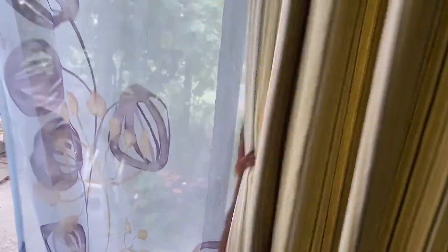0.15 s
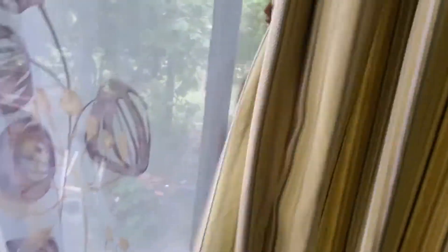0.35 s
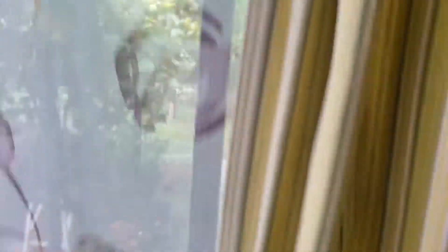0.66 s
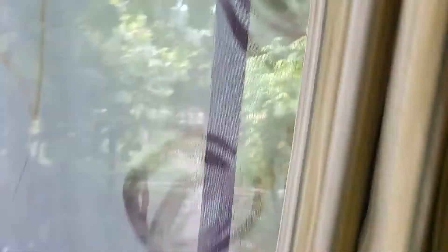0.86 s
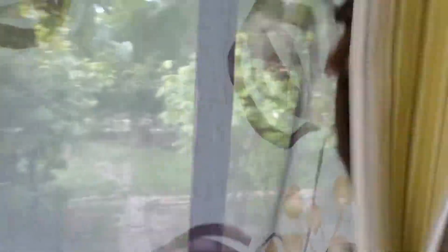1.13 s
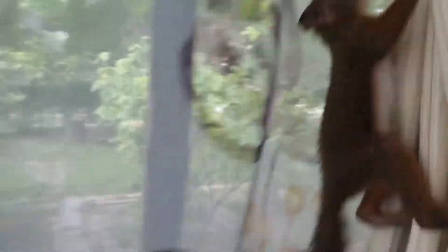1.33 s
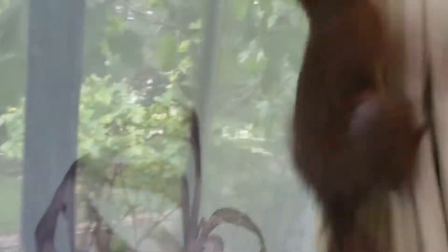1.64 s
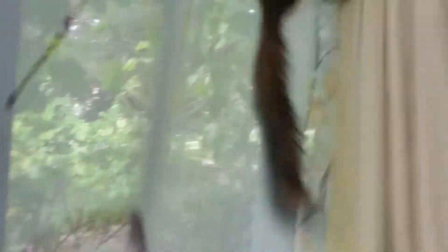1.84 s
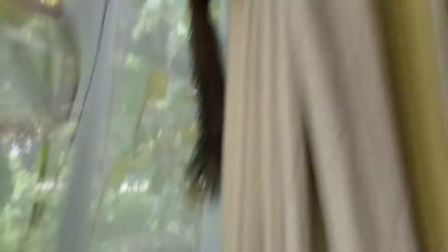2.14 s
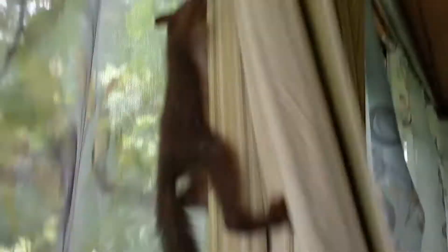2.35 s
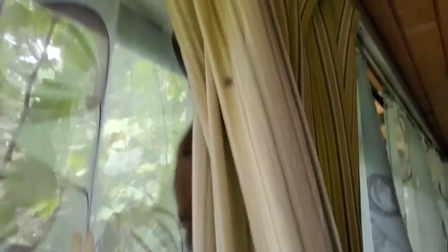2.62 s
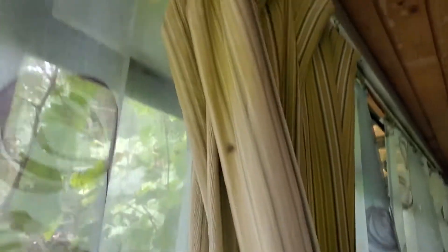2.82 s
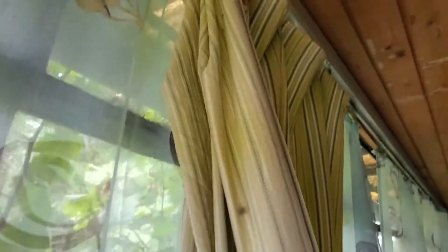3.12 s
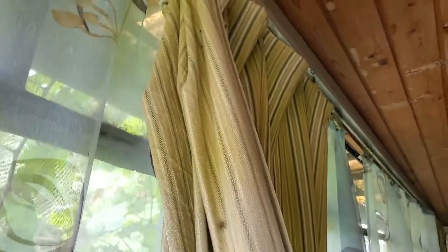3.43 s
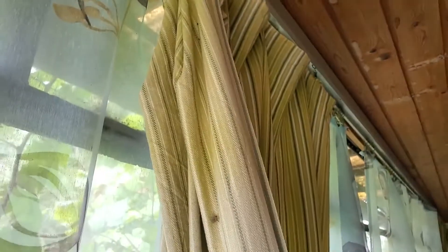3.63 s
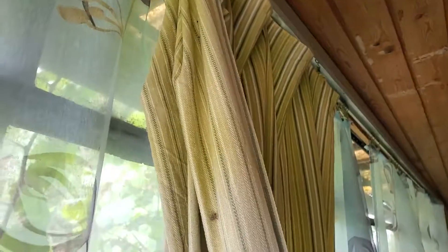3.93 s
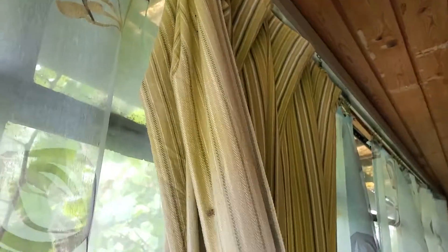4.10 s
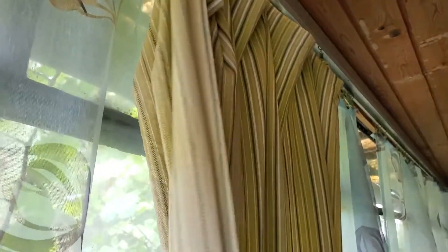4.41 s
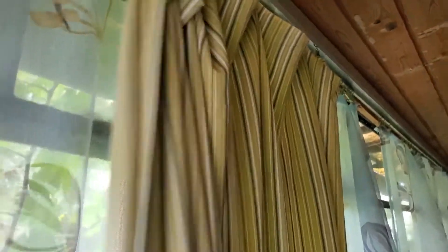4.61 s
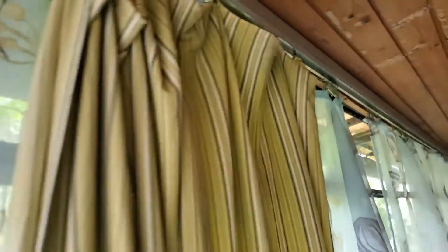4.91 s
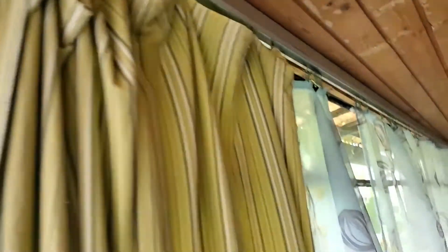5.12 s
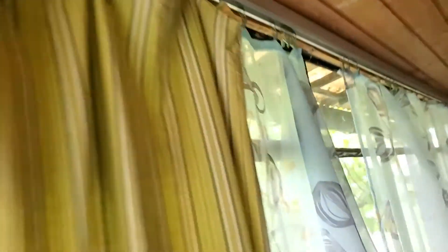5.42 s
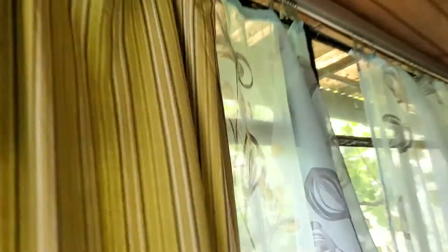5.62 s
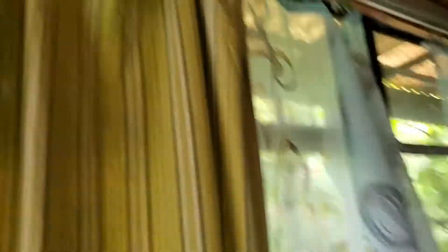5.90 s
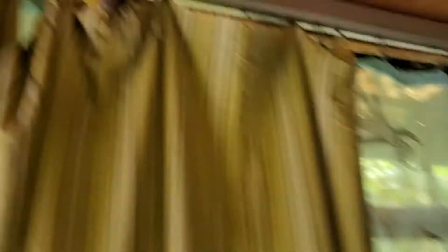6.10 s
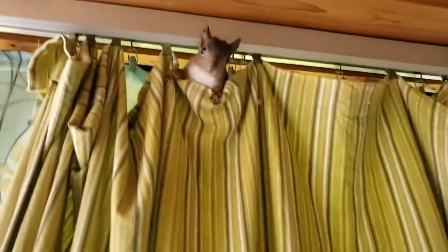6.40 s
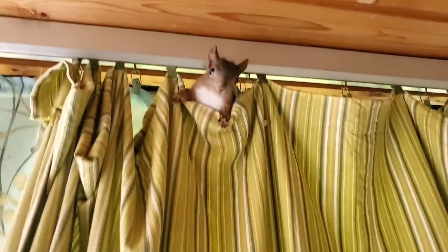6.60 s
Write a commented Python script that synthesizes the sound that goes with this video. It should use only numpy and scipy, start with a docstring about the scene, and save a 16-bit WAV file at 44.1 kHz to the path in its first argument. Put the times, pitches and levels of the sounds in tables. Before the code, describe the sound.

Close handling thumps and finger creaks mix with claws scratching through curtain fabric in a small wooden room, fading to a quiet low drone and faint hiss.

```python
"""Squirrel on a cloth curtain

A squirrel scrambles up a curtain in a small wooden room: threads slip, claws rake and snag, folds swish.
Nearer, on the case of a handheld device with two microphone ports, fingers rub, creak, drag and bump.
Cloth and skin are random stick-slip clicks, shaped and filtered; bumps are decaying sines; drags are
noise on a falling resonance. Beneath lie a low drone that swells and sinks and a faint steady hiss,
both filtered noise.
"""
import sys
import numpy as np
from scipy import signal
from scipy.fft import rfft, irfft
from scipy.io import wavfile
from scipy.ndimage import uniform_filter1d

SR = 44100
rng = np.random.default_rng(int(sys.argv[2]) if len(sys.argv) > 2 else 0)


def persist_wave(psi):
    """Save psi, clipped to +-1, as 16-bit WAV."""
    counts = np.round(np.clip(psi, -1, 1) * 32767).astype(np.int16)
    wavfile.write(sys.argv[1], SR, np.atleast_2d(counts).T)


N = 297675
TIME_S = np.arange(N) / SR

# All levels are relative: each source adds its own gain.
# Low drone that swells and sinks: t/s, level/dB
DRONE_CURVE = [(0, -57), (.18, -67.5), (.27, -51), (.42, -59), (.66, -53), (.81, -67), (.93, -41),
               (1.03, -48), (1.3, -43.5), (1.6, -51), (1.8, -46.5), (2.0, -53.5), (2.7, -52.5),
               (2.93, -40.5), (3.36, -57.5), (4.95, -52), (5.12, -57), (6.75, -54.5)]
# Force of the hand on the case, heard as rumble: t/s, level/dB
FORCE_CURVE = [(0, -62), (.18, -71), (.38, -64), (.78, -70), (.92, -52), (1.25, -41.5), (1.55, -57.5),
               (1.9, -61), (2.2, -60.5), (2.35, -66.5), (2.65, -54.5), (3.15, -59), (3.4, -77.5),
               (4.4, -71), (4.87, -64.5), (5.45, -69.5), (5.9, -65), (6.02, -54.5), (6.35, -66.5),
               (6.75, -74)]
# Fingers sliding on the case: t/s, level/dB
SLIDE_CURVE = [(0, -67.5), (.1, -76.5), (.35, -72), (.52, -72), (.75, -90.5), (1.15, -66), (1.5, -67.5),
               (2.1, -64.5), (2.33, -74), (2.6, -69.5), (3.14, -73), (3.3, -100), (5.06, -88),
               (5.17, -65.5), (5.42, -76), (5.75, -61), (5.92, -81.5), (6.12, -67), (6.45, -104)]
# Cloth sliding under the animal: t/s, level/dB
RUSTLE_CURVE = [(0, -71.5), (.8, -69.5), (1.03, -57), (1.5, -68.5), (1.58, -47), (1.84, -62.5),
                (2.03, -63.5), (2.2, -80), (2.65, -72), (3.1, -102), (3.3, -95), (4.45, -83), (4.88, -60.5),
                (5.03, -91), (5.5, -76), (5.68, -57), (5.85, -82), (6.3, -84), (6.75, -100)]

# Dull bumps of the hand: t/s, level/dB, f/Hz, t60/s
HAND_BUMPS = [(0.468, -47, 160, .09), (0.875, -35.5, 207, 0.078), (0.975, -24, 198, 0.047),
              (1.121, -28, 290, 0.099), (1.145, -15, 88, 0.037), (1.182, -12.5, 95, 0.035),
              (1.287, -23, 93, 0.061), (1.451, -49.5, 181.5, 0.26), (1.811, -28, 243, 0.044),
              (1.863, -21.5, 89.5, 0.051), (1.88, -38.5, 374.6, .16), (2.129, -40, 150, 0.14),
              (2.211, -48, 169, 0.13), (2.824, -26, 121, 0.053), (2.862, -32, 153, 0.16),
              (2.924, -21.5, 89, 0.08), (2.975, -35, 156, .1), (3.149, -43, 152, .14),
              (3.268, -32, 88.5, 0.077), (4.211, -50, 331, 0.095), (4.848, -44, 152, 0.17),
              (5.254, -42, 134, 0.14), (5.961, -38, 91, 0.12)]
# Fingers dragging to a stop: t/s, level/dB, t60/s, first f/Hz, final f/Hz, glide time constant/s
FINGER_DRAGS = [(1.06, -49, .45, 901, 311, 0.041), (1.123, -34, 0.43, 315.3, 163, 0.088),
                (4.149, -62, 0.62, 2412, 328, .045)]
# Fingers creaking on the case: t/s, level/dB, t60/s, brightness/(dB/octave), creak centre f/Hz
FINGER_CREAKS = [(0.269, -51, .04, -1.5, 2130), (0.31, -52, 0.18, 3.5, 2000), (.321, -42, 0.053, -2.5, 730),
                 (0.461, -51, 0.064, -4, 734), (0.471, -40, 0.014, -2.5, 1410),
                 (0.93, -46, 0.15, 4.5, 2860), (0.979, -33, 0.026, -1, 406), (1.028, -43, 0.054, 6.5, 2180),
                 (1.043, -31.5, 0.028, 0.5, 2150), (1.096, -36.5, 0.043, -2.5, 1950),
                 (1.123, -48, 0.09, -8, 600), (1.162, -38, 0.07, -1.5, 900), (1.205, -41.5, 0.12, 0, 720),
                 (1.369, -42, 0.1, 0, 1490), (1.566, -42.5, 0.038, -1.5, 760), (1.605, -56, 0.022, 3, 2420),
                 (1.634, -45, 0.029, -1, 2130), (1.702, -31, 0.026, -0.5, 1860),
                 (1.715, -33, 0.042, 0.5, 716), (1.731, -33.5, 0.014, -4.5, 1700),
                 (1.792, -42, 0.072, 4, 2080), (1.854, -41.5, 0.021, -.5, 590),
                 (1.88, -38.5, 0.057, -1.5, 556), (2.411, -49, 0.21, -2, 1570),
                 (2.4592, -36, 0.022, -1, 1870), (2.606, -48, .05, 0.5, 2070),
                 (2.618, -45.5, 0.065, -4, 2040), (2.6934, -42, 0.0086, -6, 2010),
                 (2.749, -42.5, 0.04, 1.5, 780), (2.772, -41, 0.019, 0, 600), (2.791, -39, 0.028, -1, 760),
                 (3.8609, -58, 0.017, -1.5, 2100), (4.001, -60, 0.36, -0.5, 454),
                 (4.163, -45.5, 0.11, 1, 2040), (4.207, -49, 0.077, -2.5, 900),
                 (4.377, -55.5, 0.34, -0.5, 480), (4.592, -53.5, 0.17, 1.5, 2040),
                 (4.631, -48.5, 0.14, .5, 2320), (4.715, -51.5, 0.098, -0.5, 1970),
                 (4.736, -41.5, 0.18, -0.5, 506), (4.769, -44, 0.12, -3, 470),
                 (4.845, -43.5, 0.038, -1, 593), (4.914, -42, 0.044, 5, 1760),
                 (5.138, -63, 0.14, -4.5, 1330), (5.235, -56.5, 0.086, -1.5, 784),
                 (5.43, -57, .06, 0, 2430), (5.557, -56.5, 0.12, 1, 1820), (6.631, -73.5, 0.18, -4, 480)]
# Folds sweeping over each other: t of the peak/s, level/dB, width scale/s, brightness/(dB/octave)
FOLD_SWISHES = [(0.6328, -42, 0.04, -1), (1.3332, -58.5, 0.06, 8.5), (1.4095, -39, 0.087, 0.0),
                (1.5877, -40, 0.042, 3), (1.6969, -37.5, 0.036, 1), (5.116, -52.5, 0.048, -0.5),
                (5.4978, -46, 0.048, -2.5), (6.06, -30.5, 0.039, 0)]
# Claws raking through the weave: t/s, level/dB, t60/s, brightness/(dB/octave), rasp centre f/Hz
CLAW_RAKES = [(0.5382, -37.5, 0.035, -8, 4860), (0.849, -46.5, 0.32, -0.5, 2600),
              (1.0975, -31, 0.018, -5, 1850), (2.0504, -43.5, 0.55, -3.5, 2300),
              (2.358, -42.5, 0.58, -4.5, 1830), (2.513, -43.5, 0.029, -4, 2400),
              (2.606, -46, 0.069, -3, 2030), (2.9623, -38, 0.17, 0, 1840), (2.9946, -42, 0.62, -6.5, 3370),
              (3.035, -35, 0.021, -2, 1900), (3.146, -35, 0.12, -3, 2310), (4.9132, -47, 0.15, -5.5, 1840),
              (5.7163, -40.5, 0.28, -0.5, 2620)]
# Threads snapping off a claw: t/s, level/dB, brightness/(dB/octave)
THREAD_SNAGS = [(.6955, -36, -3.5), (.908, -31.5, -4), (1.0762, -35, -2.5), (1.502, -29, -2.5),
                (1.545, -32.5, -9.5), (1.607, -27, -6), (1.68, -31.5, -2.5), (1.745, -53, 5.5),
                (1.8876, -48, 2.5), (1.983, -50, 0), (2.1864, -51, 1.5), (2.5562, -50, 4.5),
                (2.6926, -41.5, -3.5), (2.7584, -44, 1), (2.7713, -45, 2.5), (4.769, -52, 3),
                (4.8445, -44.5, -1), (4.887, -49, 1), (5.1672, -43.5, -2.5), (5.237, -51.5, -0.5),
                (5.37, -54.5, -0.5), (5.6259, -31, -5), (5.7175, -29.5, -0.5)]

# Spectrum of the drone: f/Hz, relative density/dB
DRONE_SPECTRUM = [(20, -34.5), (35, -12), (52, -15), (66, -10), (76, 0), (86, -9), (105, -16.5),
                  (200, -35.5), (500, -86)]
# Spectrum of the faint steady hiss: f/Hz, relative density/dB
HISS_SPECTRUM = [(150, 13.5), (400, -7), (900, -11.5), (1700, -14), (2060, -28.5), (2400, -12.5),
                 (4000, -20), (6000, -23), (9500, -23.5), (11500, -18), (16000, -18)]
# Spectrum of the flexing case: f/Hz, relative density/dB
FLEX_SPECTRUM = [(20, -27.5), (38, -11), (55, -13.5), (75, 0), (110, -8), (160, 1), (205, -11), (250, -7),
                 (300, -7), (450, -15.5), (900, -40.5)]
# Spectrum of skin on the case: f/Hz, relative density/dB
CASE_SPECTRUM = [(130, -6), (230, 1), (470, 4.5), (670, -0.5), (830, -6.5), (1020, -4), (1550, -1),
                 (2000, -4.5), (2500, -4), (3000, -7), (5000, -21), (9500, -32), (12700, -23),
                 (15800, -32.5)]
# Spectrum of the cloth: f/Hz, relative density/dB
CLOTH_SPECTRUM = [(530, -29.5), (900, -21), (1150, -19), (1400, -11.5), (1900, -1), (2700, -1), (3200, -1),
                  (3800, 0), (4800, -1.5), (5500, -5.5), (7100, -7.5), (8700, -10), (12400, -8),
                  (15800, -12)]
# Left minus right, skin on the case: f/Hz, level/dB
CASE_LEFT_MINUS_RIGHT = [(100, -19), (450, -3), (700, -6.5), (1000, -12.5), (1700, -14), (2400, -12.5),
                         (4400, -2.5), (8000, 7), (15000, -12)]
# Left minus right, cloth: f/Hz, level/dB
CLOTH_LEFT_MINUS_RIGHT = [(400, -27), (1200, -16.5), (2400, -11.5), (3700, -11), (4800, -2.5), (7000, -8.5),
                          (8500, 4.5), (11000, -3.5), (15000, 2.5)]
# Decay of the room: f/Hz, t60/s
ROOM_DECAY = [(300, 0.45), (2000, 0.32), (7000, 0.27), (15000, 0.25)]
# Low after-ring of a bump: f/Hz, t60/s
BOOM_DECAY = [(80, 0.61), (170, 0.55), (400, 0.36)]

DRONE_STEADY = 0.71  # exponent: 0 leaves the drone's random beating, 1 evens it out
BOOM_DB = -7.5  # after-ring gain
RUB_FLEX_DB = 2  # rubbing's share of the case flexing, against the hand's force
RUB_DB = -20.5  # peak of the rubbing swell, against its creak's table level
RUB_RISE_S, RUB_FALL_S = 0.018, 0.036  # exponential time constants of the swell
DRAG_WIDTH, DRAG_RISE_S = 0.6, 0.0013  # random wobble knots per cycle; linear onset
BREAK_DB = 15  # click as a finger breaks loose, before the creak's filter and gain
RUB_HISS_DB, RUB_HISS_HZ, RUB_HISS_Q = -24, 1983, 6
RUB_HISS_GROWTH = 0.64  # dB of hiss per dB of rubbing
EDGE_HZ = 15900


def amp(db):
    """Decibels to amplitude gain."""
    return 10 ** (np.asarray(db) / 20)


def evened(x):
    """Scales to unit rms."""
    return x / np.sqrt(np.mean(x ** 2) + 1e-20)


def read(points, hz):
    """Interpolates a table on a logarithmic frequency axis."""
    table_hz, value = np.transpose(points)
    return np.interp(np.log(hz + 1), np.log(table_hz + 1), value)


def follow(curve):
    """Turns a dB curve into a gain per sample."""
    return amp(np.interp(TIME_S, *np.transpose(curve)))


def add(mix, start_s, sound):
    """Mixes a sound in from a start time."""
    part = mix[..., max(round(start_s * SR), 0):][..., :sound.shape[-1]]
    part += sound[..., :part.shape[-1]]


def high_pass(x, edge_hz):
    """First-order high-pass."""
    return signal.sosfilt(signal.butter(1, edge_hz, "high", fs=SR, output="sos"), x)


def port_gains(left_minus_right_db):
    """Left and right gains with the given ratio and a mean of one."""
    lean = amp(left_minus_right_db)
    return np.array([lean, np.ones_like(lean)]) * 2 / (1 + lean)


def colour(x, spectrum, left_minus_right=None, size=4096):
    """Minimum-phase filter, normalised in energy before any split between the ports."""
    hz = abs(np.fft.fftfreq(size, 1 / SR))
    gain = evened(amp(read(spectrum, hz)))[None]
    if left_minus_right is not None:
        gain = gain * port_gains(read(left_minus_right, hz))
    minimum_phase = np.exp(np.conj(signal.hilbert(np.log(gain))))
    response = np.fft.ifft(minimum_phase).real[:, :size // 2]
    return signal.oaconvolve(np.atleast_2d(x), response, axes=1)[:, :N]


def tilted(x, db_per_octave, centre_hz=2000, peak_db=0, octaves=0.45):
    """Tilts a burst's spectrum about 2 kHz and lifts a band where the contact rings."""
    count = x.shape[-1]
    hz = np.clip(np.fft.rfftfreq(2 * count, 1 / SR), 200, 12000)
    slope_db = db_per_octave * np.log2(hz / 2000)
    lift_db = peak_db * np.exp(-0.5 * (np.log2(hz / centre_hz) / octaves) ** 2)
    return irfft(rfft(x, 2 * count) * amp(slope_db + lift_db))[..., :count]


def noise_pair(same, count=N):
    """White noise at two ports, sharing the fraction `same` of its power."""
    shared = rng.standard_normal(count)
    own = rng.standard_normal((2, count))
    return np.sqrt(same) * shared + np.sqrt(1 - same) * own


def slips(count, per_s, spread_db, same=0.28):
    """Stick-slip clicks at random times and of uneven size, partly shared by the ports; unit rms."""
    sizes = amp(spread_db * np.minimum(rng.exponential(1, count), 4))
    happens = rng.random(count) < per_s / SR
    return evened(sizes * happens * noise_pair(same, count))


def clumps(per_s, depth_db):
    """Randomly wandering gain, as contact tightens and loosens."""
    knots = rng.standard_normal(N // 20)
    return evened(amp(depth_db * np.interp(TIME_S * per_s, np.arange(len(knots)), knots)))


def stroke(t60_s, rise_s, hold_s):
    """Stroke envelope: linear rise, with an exponential decay that starts after the hold."""
    t = TIME_S[:SR // 4]
    fall_db = 60 * np.maximum(t - hold_s, 0) / t60_s
    return amp(-fall_db) * np.minimum(t / rise_s, 1)


def scatter(x, decay, low_hz):
    """Sparse random echoes, different at each port, each band decaying at its own rate."""
    shape = (2, SR // 2)
    taps = rng.choice([-1., 1.], shape) * (rng.random(shape) < 1 / 4)
    hz, t, bands = signal.stft(taps, SR, nperseg=128)
    fade = amp(-60 * t / read(decay, hz)[:, None])
    tail = high_pass(signal.istft(bands * fade, SR)[1], low_hz)
    tail = tail / np.linalg.norm(tail, axis=1, keepdims=True)
    return signal.fftconvolve(np.atleast_2d(x), tail, axes=1)[:, :N]


def narrow_bass(x, edge_hz):
    """Long waves reach both ports alike: the port difference is high-passed."""
    mid = x.mean(0)
    return mid + high_pass(x - mid, edge_hz)


def drone_and_hiss():
    """Low noise band that swells and sinks, its beating partly evened, over a faint steady hiss."""
    drone = colour(noise_pair(same=0.97), DRONE_SPECTRUM, size=16384)
    beating = np.sqrt(uniform_filter1d((drone ** 2).mean(0), size=4000) + 1e-9)
    steadied = evened(drone / beating ** DRONE_STEADY)
    drone = follow(DRONE_CURVE) * steadied * amp([[0.5], [1.5]])
    return drone + amp(-70.5) * colour(noise_pair(same=0.1), HISS_SPECTRUM)


def rubbing():
    """Strength of skin friction: slow sliding plus a swell around every creak, summed as power."""
    power = follow(SLIDE_CURVE) ** 2
    t = TIME_S[:SR // 2] - TIME_S[SR // 8]
    swell = np.exp(np.minimum(t / RUB_RISE_S, -t / RUB_FALL_S))
    for creak_s, db, *_ in FINGER_CREAKS:
        add(power, creak_s + t[0], (amp(db + RUB_DB) * swell) ** 2)
    return np.sqrt(power)


def hand(rub):
    """Bumps ring as decaying sines and boom on; grip and rubbing flex the case into rumble."""
    thuds, t = np.zeros(N), TIME_S[:SR // 4]
    for start_s, db, hz, t60_s in HAND_BUMPS:
        ring = amp(db - 60 * t / t60_s) * np.sin(2 * np.pi * hz * t)
        soft_onset = 1 - np.exp(-t / 0.0084)
        add(thuds, start_s, amp(1.0) * ring * soft_onset)
    boom = amp(BOOM_DB) * narrow_bass(scatter(thuds, BOOM_DECAY, low_hz=130), edge_hz=570)
    flexing = np.hypot(follow(FORCE_CURVE), amp(RUB_FLEX_DB) * rub)
    rumble = amp(-3.5) * flexing * colour(noise_pair(same=0.64), FLEX_SPECTRUM)
    return (thuds + boom + rumble) * amp([[-0.7], [0.7]])


def drags():
    """Rough slips excite a resonance that sinks as the finger slows."""
    out, t = np.zeros((2, N)), TIME_S[:SR // 2]
    for start_s, db, t60_s, first_hz, last_hz, glide_s in FINGER_DRAGS:
        hz = last_hz * (first_hz / last_hz) ** np.exp(-t / glide_s)
        cycles = np.cumsum(hz) / SR
        knots = rng.standard_normal((2, 1000))
        # random amplitude and phase widen the resonance
        wobble = np.interp(cycles * DRAG_WIDTH, np.arange(knots.shape[1]), knots[0] + 1j * knots[1])
        tone = (wobble * np.exp(2j * np.pi * cycles)).real
        fade = amp(db - 60 * t / t60_s) * np.minimum(t / DRAG_RISE_S, 1)
        add(out, start_s, fade * tone * port_gains(read(CASE_LEFT_MINUS_RIGHT, hz)))
    return out


def fingers(rub):
    """Skin sticks and slips on a case that rings briefly; a narrow hiss follows the rubbing."""
    skin = amp(6.5) * rub * slips(N, per_s=1500, spread_db=2.0) * clumps(per_s=95, depth_db=3.5)
    for start_s, db, t60_s, bright, hz in FINGER_CREAKS:
        envelope = stroke(t60_s, rise_s=0.0047, hold_s=0.0043)
        creak = envelope * slips(len(envelope), per_s=3500, spread_db=5.0)
        creak[:, SR // 1000] += amp(BREAK_DB)
        ring_db = 9.0 + 0.9 * np.log2(hz / 1500)  # the palm damps low creaks more than high ones
        add(skin, start_s, amp(db - 4.5) * tilted(creak, bright, hz, ring_db, octaves=0.25))
    skin = narrow_bass(skin, edge_hz=1840)

    case_decay = [(400, 0.037), (2000, 0.0097), (10000, 0.0037)]  # f/Hz, t60/s
    ringing = amp(-2.0) * skin + amp(-4.5) * scatter(skin, case_decay, low_hz=660)

    band = signal.lfilter(*signal.iirpeak(RUB_HISS_HZ, RUB_HISS_Q, SR), noise_pair(same=0.071))
    smooth_rub = np.abs(uniform_filter1d(rub, size=SR // 5))
    hiss = amp(RUB_HISS_DB) * smooth_rub ** RUB_HISS_GROWTH * evened(band) * amp([[-9], [2.5]])

    in_room = ringing + amp(-10.5) * scatter(skin, ROOM_DECAY, low_hz=304)
    return colour(in_room, CASE_SPECTRUM, CASE_LEFT_MINUS_RIGHT) + hiss


def rustle():
    """Threads slip in clumps as cloth slides under the animal."""
    return follow(RUSTLE_CURVE) * slips(N, per_s=15000, spread_db=2.5) * clumps(per_s=42, depth_db=3.0)


def add_swishes(weave):
    """Folds sweep over each other: dense slips under a symmetric swell."""
    t = TIME_S[:SR // 2]
    for peak_s, db, width_s, bright in FOLD_SWISHES:
        swell = 1 / np.cosh((t - t.mean()) / width_s * 2.01)
        swish = swell * slips(len(t), per_s=20000, spread_db=4.0)
        add(weave, peak_s - t.mean(), amp(db - 6.0) * tilted(swish, bright))


def add_rakes(weave):
    """Claws pull thread after thread: a stroke of slips with a rasping band."""
    for start_s, db, t60_s, bright, hz in CLAW_RAKES:
        envelope = stroke(t60_s, rise_s=0.0022, hold_s=0.017)
        pull = envelope * slips(len(envelope), per_s=6000, spread_db=-7.5)
        pull = tilted(pull, 0, centre_hz=11600, peak_db=5, octaves=0.46)  # sharp claw tips add fizz
        add(weave, start_s, amp(db - 7.5) * tilted(pull, bright, hz, peak_db=7, octaves=0.28))


def add_snags(weave):
    """Single threads snap off a claw: dense slips that die within milliseconds."""
    t = TIME_S[:SR // 2]
    for start_s, db, bright in THREAD_SNAGS:
        snap = np.exp(-t / 0.0039) * slips(len(t), per_s=24000, spread_db=3.5)
        add(weave, start_s, amp(db - 2.5) * tilted(snap, bright))


def curtain():
    """All contact with the weave, direct and echoed by the room, in the cloth's colour."""
    weave = rustle()
    add_swishes(weave)
    add_rakes(weave)
    add_snags(weave)
    in_room = amp(-3.0) * weave + amp(-7.5) * scatter(weave, ROOM_DECAY, low_hz=300)
    return colour(in_room, CLOTH_SPECTRUM, CLOTH_LEFT_MINUS_RIGHT)


def scene():
    """Sums curtain, fingers, hand, drone and hiss; one rubbing curve drives fingers and hand."""
    rub = rubbing()
    return curtain() + fingers(rub) + drags() + hand(rub) + drone_and_hiss()


def record(dry):
    """Band limit of the device: linear-phase low-pass."""
    low_pass = signal.firwin(511, EDGE_HZ, window=("kaiser", 9), fs=SR)
    return signal.oaconvolve(dry, low_pass[None], "same")


dry = scene()
out = record(dry)
persist_wave(out)
```